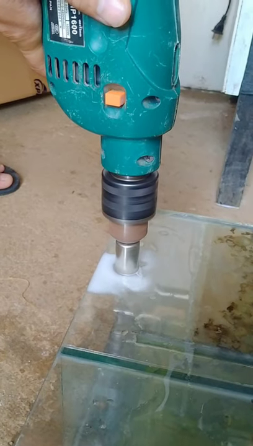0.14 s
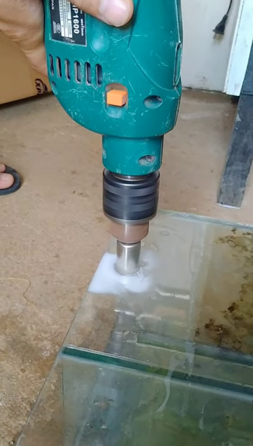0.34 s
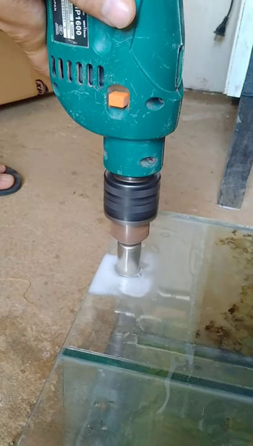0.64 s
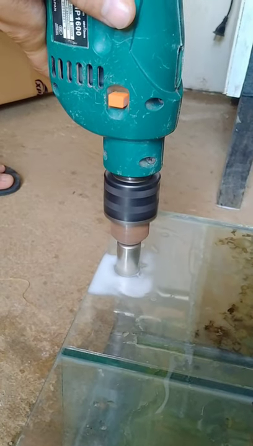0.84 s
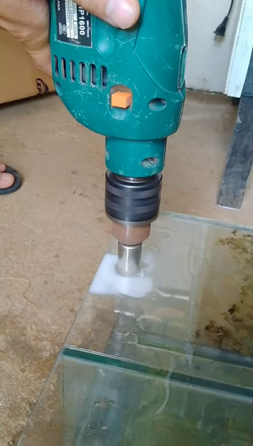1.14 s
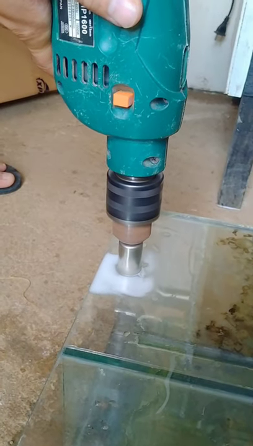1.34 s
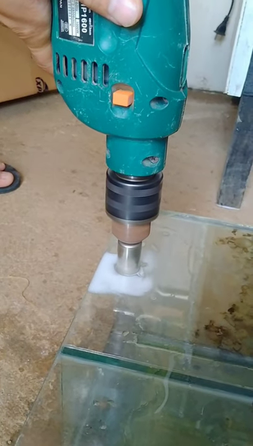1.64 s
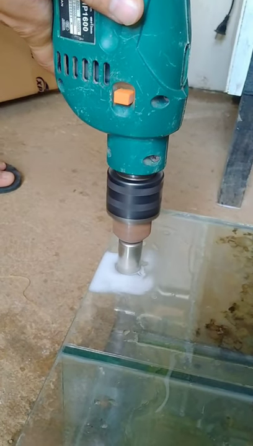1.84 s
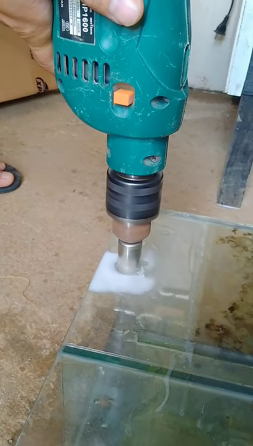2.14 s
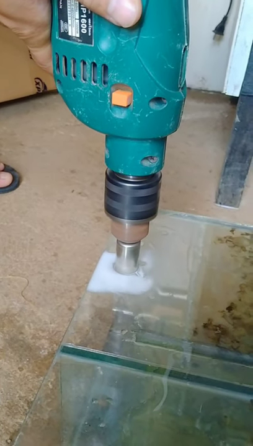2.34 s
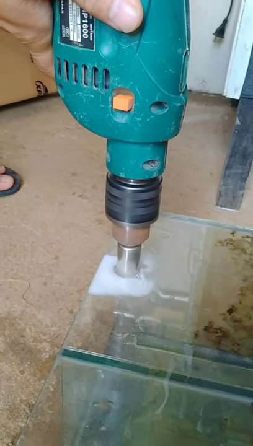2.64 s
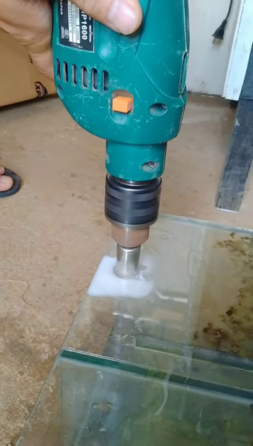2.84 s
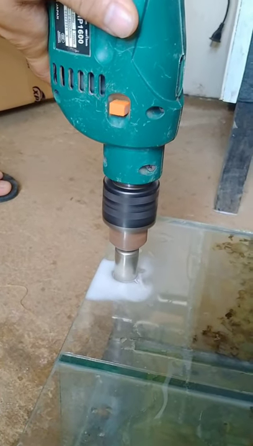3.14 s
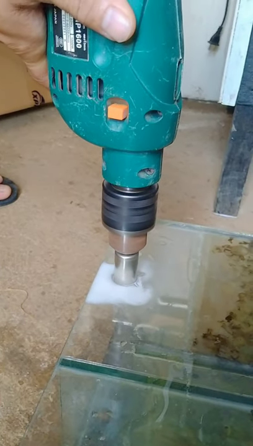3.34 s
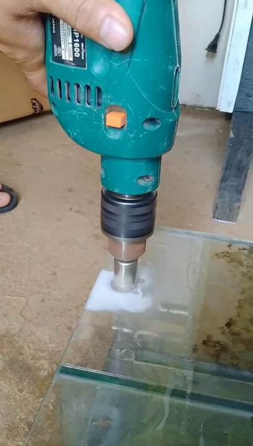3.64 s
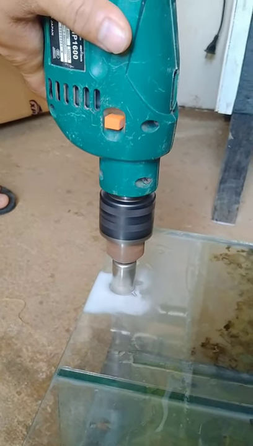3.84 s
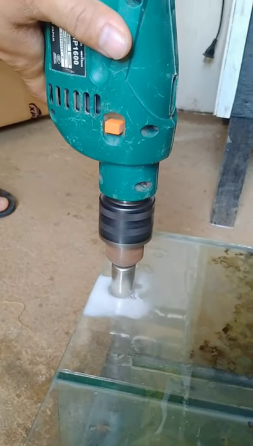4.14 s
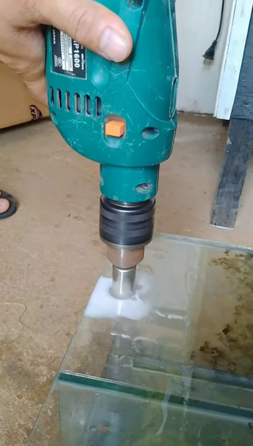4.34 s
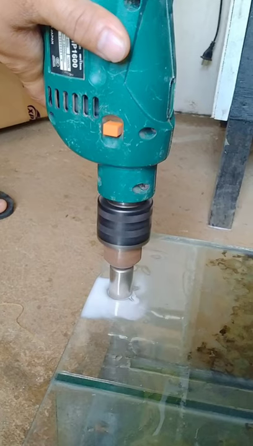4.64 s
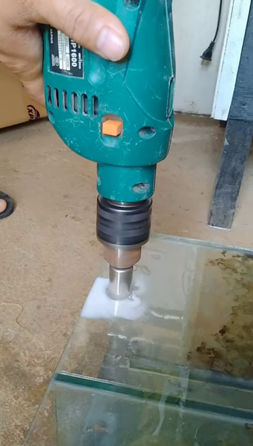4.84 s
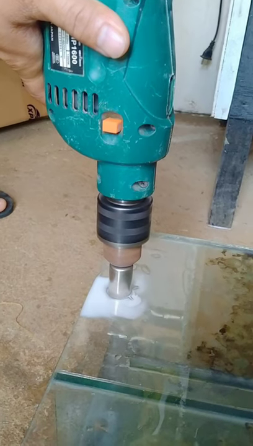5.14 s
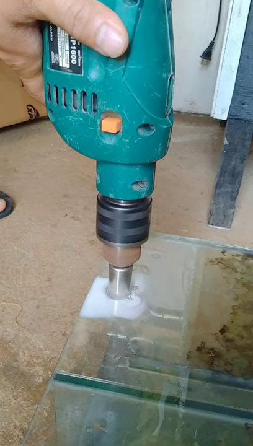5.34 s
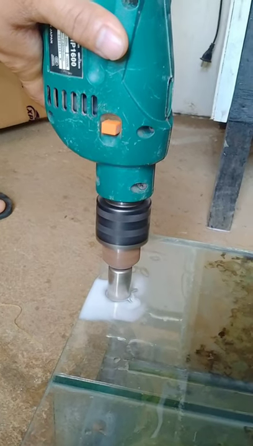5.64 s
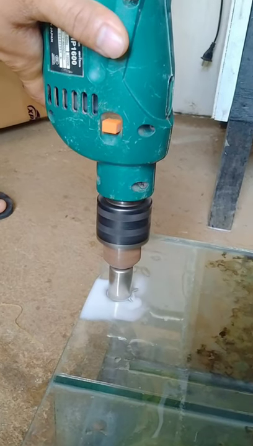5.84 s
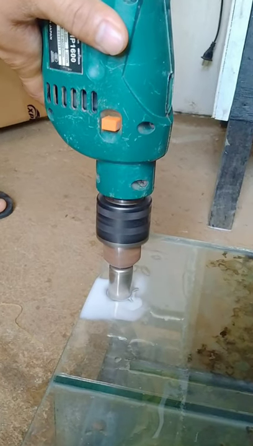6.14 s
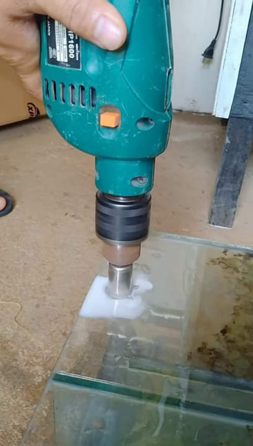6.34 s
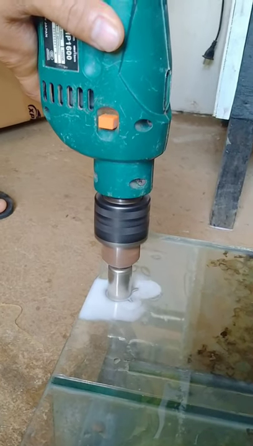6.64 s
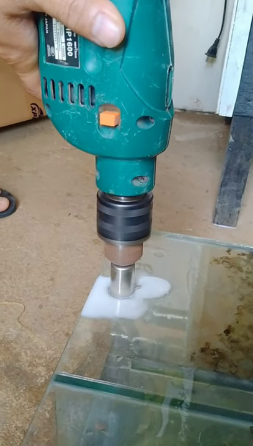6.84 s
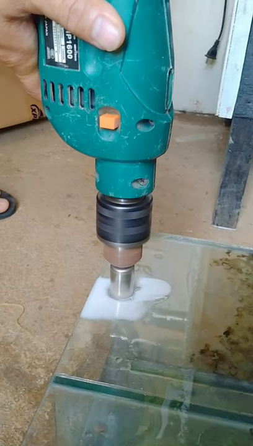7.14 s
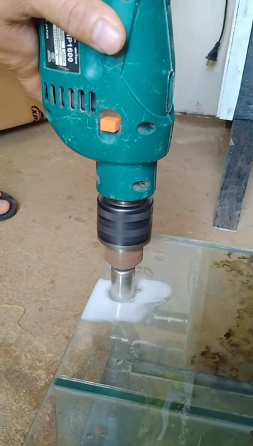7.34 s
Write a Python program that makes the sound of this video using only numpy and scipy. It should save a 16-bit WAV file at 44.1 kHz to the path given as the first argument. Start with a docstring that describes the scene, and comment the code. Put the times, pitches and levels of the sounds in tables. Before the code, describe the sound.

A corded drill is already running, its hollow bit squealing and chattering in wet glass. The speed sags briefly, then recovers and holds. A harsh mid-high squeal leads first, with short purer singing moments and shrill flares; later a lower squeal takes over as the bit binds. Gritty hiss, motor whine and fan rush continue throughout. Close microphone, dry sound, no echo.

```python
"""Core drill in wet glass

A corded drill turns a diamond core bit in wet glass, close by, without a pause.
The bit chatters at three resonances and re-cuts its own wavy groove, so the squeal splits into
multiples of the spindle speed. It mostly rocks in the cut; when it seats flush the leading resonance
sings louder and purer, and while it binds the low one takes over.
Grit grinds underneath, the motor whines through its gear and the cooling fan blows."""
import sys
import numpy as np
from scipy import signal
from scipy.fft import rfft, irfft, next_fast_len
from scipy.io import wavfile
from scipy.ndimage import uniform_filter1d, minimum_filter1d, map_coordinates

SR = 44100
rng = np.random.default_rng(int(sys.argv[2]) if len(sys.argv) > 2 else 0)


def generate_wav(signal):
    """Clip the signal to [-1, 1] and save it as 16-bit WAV at the path in sys.argv[1]."""
    frames = np.transpose(np.atleast_2d(signal))
    scaled = np.clip(frames, -1, 1) * 32767
    pcm = np.round(scaled).astype(np.int16)
    wavfile.write(sys.argv[1], SR, pcm)


N = 330309  # length in samples

# The low resonance while the bit rocks; it takes over as the cut deepens.
# Each row: time in seconds, level in dB and centre in Hz, both before the bit seats.
LOW_CHATTER = [(0, -11.5, 1094), (.42, -10, 1082), (.52, -17, 1035), (.75, -14.5, 1065), (1.1, -16, 1045),
               (2.6, -19.5, 1020), (3.9, -16.5, 1013), (4.45, -14, 1087), (5.15, -11.5, 1107),
               (5.7, -14, 1109), (6.35, -15, 1127), (6.62, -15.5, 1125), (6.82, -19.5, 1073),
               (7.49, -18.5, 1047)]
# The middle resonance, which leads from about half a second until the bit binds.
# Each row: time in seconds, level in dB before the bit seats, centre in Hz.
MIDDLE_CHATTER = [(0, -13.5, 2063), (.35, -14, 1997), (.68, -11.5, 2052), (1.2, -13.5, 1996),
                  (3.3, -14.5, 1990), (4.22, -16, 2011), (4.33, -22, 2084), (4.55, -21, 2064),
                  (4.75, -30.5, 2105), (6.62, -34.5, 2210), (6.8, -22, 2040), (7.49, -24.5, 2030)]


def amp(db):
    """Decibels turned into a plain multiplier."""
    return 10 ** (np.asarray(db) / 20)


def unit(x):
    """x scaled to an rms (average strength) of 1."""
    return x / np.sqrt(np.mean(np.abs(x) ** 2) + 1e-20)


def curves(rows):
    """One value per sample for each column after the time, joined by straight lines."""
    times, *columns = np.transpose(rows)
    return [np.interp(np.arange(N) / SR, times, column) for column in columns]


def wobble(rate):
    """A smooth random curve with rate random points a second."""
    points = rng.standard_normal(int(N * rate / SR) + 4)
    fine = signal.resample_poly(points, 10, 1)
    return np.interp(np.arange(N) * rate * 10 / SR, np.arange(len(fine)), fine)


def spell(middle_s, length_s):
    """A rounded swell from 0 to 1 and back."""
    return np.exp(-np.abs(2 * (np.arange(N) / SR - middle_s) / length_s) ** 3)


def filtered(x, response):
    """x with each frequency multiplied by response(Hz)."""
    size = next_fast_len(N + SR // 4)
    return irfft(rfft(x, size) * response(np.fft.rfftfreq(size, 1 / SR)), size)[:N]


def coloured(x, spectrum):
    """x shaped by (Hz, dB) points, at rms 1."""
    f, db = np.transpose(spectrum)
    return unit(filtered(x, lambda hz: amp(np.interp(np.log(hz + 1), np.log(f + 1), db))))


def ringing(x, modes):
    """x through resonances (Hz, half-width in Hz, dB): each is strongest at its centre."""
    def response(hz):
        power = sum(amp(db) ** 2 / (1 + ((hz - centre) / width) ** 2) ** 2 for centre, width, db in modes)
        return np.sqrt(power)
    return filtered(x, response)


def low_margin():
    """By how many dB the low resonance leads the middle one."""
    return curves(LOW_CHATTER)[0] - curves(MIDDLE_CHATTER)[0]


def binding():
    """0 while the bit runs free, 1 when it binds deep in the cut."""
    full_margin_db = 13.5
    return np.clip(low_margin() / full_margin_db, 0, 1)


def chatter(level_db, centre_hz, spread_hz, speed, turns, orders, skew, sweep, wear):
    """Self-excited ringing: the multiples of the spindle speed that lie near a resonance grow."""
    wave, power = 0, 0
    for k in orders:
        off = (k * speed - centre_hz) / spread_hz
        # a skew above 1 lets the ringing reach further above the centre than below it
        weight = np.exp(-np.maximum(off / skew, -off * skew))
        # higher multiples come later: each turn is a small upward chirp
        lag = sweep * (k - orders.mean()) ** 2 / 2
        drift = wear * wobble(2.036)  # the waves in the groove creep as it wears
        wave = wave + weight * np.exp(2j * np.pi * (k * turns - lag + drift))
        power = power + weight ** 2
    wave /= np.sqrt(power + 1e-20)
    # the bit lifts off at large swings, which evens them out
    wave /= (np.abs(wave) ** 2 + 2.4) ** 0.26
    return amp(level_db) * unit(wave.real)


def chirp_sweep(bedded):
    """Each turn's chirp is drawn out as the bit beds in (turns of lag per multiple)."""
    first, bed_in_s = .055, 2.4
    progress = np.minimum(np.arange(N) / SR / bed_in_s, 1)
    return first + (bedded - first) * progress ** 2


def shrill(speed, turns, sweep):
    """The top resonance idles faintly and flares up in spells."""
    # Each row: middle in seconds, length in seconds, level in dB added to the idling, centre in Hz.
    flares = [(.52, 0.49, -23.5, 2980), (2.38, 0.27, -21, 2936), (2.878, 0.36, -22, 2930),
              (3.33, 0.7, -25.5, 2975)]
    rest_db, rest_hz = -45.5, 2886  # between the spells
    size, centre_hz = amp(rest_db), rest_hz
    for middle_s, length_s, db, hz in flares:
        swell = spell(middle_s, length_s)
        size = size + amp(db) * swell
        centre_hz = centre_hz + (hz - rest_hz) * swell
    return size * chatter(0, centre_hz, 45, speed, turns, np.arange(76, 104),
                          skew=1.3, sweep=sweep, wear=0.2)


def squeal(speed, turns):
    """Three resonances chatter at one contact, adding octave and sum tones; the lower two alternate."""
    # The bit seats flush in its groove, or tips out of it.
    # Each row: middle in seconds, length in seconds, firmness (1 is flush, below 0 is tipped).
    seatings = [(0.022, 0.095, .5), (1.03, .18, 0.48), (1.28, 0.16, -0.2), (1.524, 0.25, 0.6),
                (1.74, 0.1, -.5), (1.87, 0.13, .3), (2.12, 0.28, 1), (2.38, 0.22, -0.36),
                (2.73, 0.14, 0.82), (2.88, 0.094, -0.65), (3.66, 0.38, 0.67), (4.795, 0.23, 0.21),
                (5.68, 0.13, -.5), (5.893, 0.21, 0.26), (6.56, 0.27, 0.66)]
    gain_db, loss_db = 5, 4.5  # when seated the leading resonance gains, the other loses
    sag_hz = 42.5  # the low resonance drops as the bit seats, by half of this when bound
    low_rocking_hz, low_bound_hz, middle_rocking_hz, seated_hz = 71, 57, 70, 16.7  # chatter spread
    lead_db = 1  # margin by which one resonance takes the lead

    seat = sum(firm * spell(middle_s, length_s) for middle_s, length_s, firm in seatings)
    lead = (1 + np.tanh(low_margin() / lead_db)) / 2  # 1 when the low resonance leads
    bind = binding()

    def favour_db(share):
        seated_db = seat * (gain_db * share - loss_db * (1 - share))
        return seated_db + 1.1 * wobble(25) + 0.52 * wobble(9)

    def spread(rocking_hz):
        return rocking_hz * (seated_hz / rocking_hz) ** np.clip(seat, -.2, 1)

    low_db, low_hz = curves(LOW_CHATTER)
    middle_db, middle_hz = curves(MIDDLE_CHATTER)
    low_spread = spread(low_rocking_hz + bind * (low_bound_hz - low_rocking_hz))
    middle_sweep = chirp_sweep(.11)
    low = chatter(low_db + favour_db(lead), low_hz - sag_hz * seat * (1 - bind / 2), low_spread,
                  speed, turns, np.arange(26, 42), skew=1.26, sweep=chirp_sweep(.21), wear=0.13)
    # half a turn later, so the two take turns within each revolution
    middle = chatter(middle_db + favour_db(1 - lead), middle_hz, spread(middle_rocking_hz),
                     speed, turns + .5, np.arange(52, 73), skew=1.13, sweep=middle_sweep, wear=0.13)
    overtones = amp(-11.0) * low * low + amp(-11.0) * low * middle + amp(-34.5) * middle * middle
    bright_overtones = filtered(overtones, lambda hz: hz > 1500)
    return low + middle + shrill(speed, turns, middle_sweep) + bright_overtones


def groove(turns, memory_turns, size):
    """Roughness round the cut, size points a turn: met again each turn, slowly worn into a new shape."""
    keep = np.exp(-1 / memory_turns)
    fresh = rng.standard_normal((int(turns[-1]) + 2, size))
    fresh[0] /= np.sqrt(1 - keep ** 2)  # the first turn is as rough as the later ones
    track = signal.lfilter([1], [1, -keep], fresh, axis=0).ravel()
    return unit(map_coordinates(track, [turns * size]))


def grinding(turns):
    """Diamond grit scrapes round the groove, biting unevenly, and rings pane, bit and rim."""
    # Resonances of the glass pane, of the middle chatter (damped by a binding bit), of the hollow
    # bit and of its bright rim. Each row: centre in Hz, half-width in Hz, relative level in dB.
    pane_modes = [(425, 193, -9), (699, 77, -2), (1050, 145, 1), (1210, 147, 0.5), (1688, 190, -4),
                  (2274, 63, 0.5), (2650, 129, 1.5), (2790, 65, 4.5), (2990, 96, -6.5), (3054, 69, 0.5),
                  (3316, 89, 0.5)]
    middle_modes = [(2040, 92, 4.5)]
    bit_modes = [(3488, 21, 2.5), (3626, 64, 1), (3843, 157, -10)]
    rim_modes = [(5565, 65, 0)]
    # Tone colour of the grit's hiss. Each row: frequency in Hz, relative level in dB per Hz.
    hiss_colour = [(2290, -39), (3900, -1.5), (4060, 0.5), (4610, -5.5), (5210, -6), (5680, -10.5),
                   (5940, -10), (7800, -18.5), (8500, -35), (9540, -43), (11600, -36), (15500, -27.5)]
    # Loudness of the hiss. Each row: time in seconds, level in dB before its gain.
    hiss_course = [(0.0, -38), (2.8, -39), (4.04, -34.5), (4.63, -34.5), (4.65, -36), (5.55, -35.5),
                   (5.97, -38), (6.74, -34.5), (7.49, -33.5)]
    # Grit on the pane. Each row: time in seconds, level in dB.
    rasp_course = [(0, -14), (2.3, -14), (4.5, -15), (7.49, -16.5)]
    hiss_gain_db = 2.5
    bit_db = -2.5  # ring of the free bit beside the pane
    bind_middle_db, bind_bit_db = -6.5, 4  # change in ringing when the bit binds
    rim_db, rim_growth = -47.5, 2.2  # the rim swells faster than the hiss

    rasp_db, = curves(rasp_course)
    hiss_db, = curves(hiss_course)
    bind = binding()

    def scrape(repeat):
        return repeat * groove(turns, memory_turns=6.7, size=1280) + rng.standard_normal(N)

    bite = amp(1.5 * groove(turns, memory_turns=14, size=6))
    force = bite * scrape(repeat=1.1)
    rings = ringing(force, pane_modes)
    rings = rings + amp(bind_middle_db * bind) * ringing(force, middle_modes)
    rings = rings + amp(bit_db + bind_bit_db * bind) * ringing(force, bit_modes)
    hiss = amp(hiss_db + hiss_gain_db) * coloured(scrape(repeat=0.6), hiss_colour)
    rim_level = amp(rim_db + rim_growth * (hiss_db - hiss_db.mean()))
    rim = rim_level * unit(ringing(force, rim_modes))
    return amp(rasp_db) * unit(rings) + hiss + rim


def motor(turns):
    """Armature tones with sidebands from the gear wheel, the ringing casing and the brushes' fizz."""
    # Each row: time in seconds, gain in dB of the higher tones and the casing.
    whine_course = [(0, -14.5), (2.4, -4.5), (3.4, -8.5), (5.6, -10), (6.9, -1.5), (7.49, -1.5)]
    # Each row: time in seconds, gain in dB of the two lowest multiples of the motor speed.
    hum_course = [(0, -15), (2.4, -7.5), (3.6, -12.5), (5.8, -7.5), (6.5, -5), (7.15, -1), (7.49, -4)]
    # Armature tones. Each row: multiple of the motor speed, sideband in spindle turns.
    tones = [(1, 0), (1, 1), (2, 0), (2, 1), (4, -3), (5, 0), (8, 0), (8, 1), (16, 1), (16, 2), (34, 0)]
    # One level in dB for each tone, before the gains above.
    tone_levels = [-32, -37.5, -34.5, -30, -29, -34, -31, -25.5, -50.5, -51.5, -63]
    # Casing rung by the armature. Each row: centre in Hz, half-width in Hz, relative level in dB.
    casing_modes = [(2785, 97, 6), (5610, 67, -14.5)]
    # Fizz of the brushes. Each row: frequency in Hz, relative level in dB per Hz.
    brush_colour = [(4000, -13), (8000, -2.5), (9500, -6), (10500, -2), (11800, -1), (12600, -3.5),
                    (15500, -7.5)]
    gear = 29 / 3  # motor turns per spindle turn

    whine_db, = curves(whine_course)
    hum_db, = curves(hum_course)
    motor_turns = gear * turns + 0.0021 * wobble(38)  # play in the gear
    sound = amp(whine_db - 24) * unit(ringing(rng.standard_normal(N), casing_modes))
    for (k, side), db in zip(tones, tone_levels):
        gain_db = hum_db if k <= 2 else whine_db
        level_db = db + gain_db + 2.5 * wobble(7)
        cycles = k * motor_turns + side * turns + rng.random()
        sound += np.sqrt(2) * amp(level_db) * np.sin(2 * np.pi * cycles)
    fizz = amp(-50.5) * coloured(rng.standard_normal(N), brush_colour)
    return sound + fizz


def fan():
    """Cooling air leaves the vents in a low, uneven rush, made of shaped noise."""
    # Loudness of the draught. Each row: time in seconds, level in dB before its gain.
    draught_course = [(0.0, -29), (0.1, -27.5), (1.48, -34), (2.33, -29), (2.86, -39), (3.0, -31.5),
                      (4.07, -27.5), (6.4, -38), (6.51, -32.5), (7.49, -38.5)]
    # Tone colour of the draught. Each row: frequency in Hz, relative level in dB per Hz.
    air_colour = [(13, -72), (22, -38), (43, -40.5), (93, -5.5), (129, 0), (312, -0.5), (341, -4),
                  (450, -11), (580, -35), (990, -120)]
    gain_db = -0.8
    air_db, = curves(draught_course)
    level = amp(air_db + gain_db + 0.55 * wobble(7.5))
    return level * coloured(rng.standard_normal(N), air_colour)


def scene():
    """One spindle, sagging under load and recovering, drives the squeal, the grit and the motor."""
    # Each row: time in seconds, spindle speed in turns per second.
    spindle = [(0, 30.9), (.15, 29.66), (.38, 28.8), (.5, 29.26), (.7, 32.05), (.88, 33.65), (1.1, 34.52),
               (1.5, 35.28), (2.2, 35.68), (3.7, 35.82), (5.35, 35.38), (6, 35.73), (7.49, 35.78)]
    speed, = curves(spindle)
    turns = np.cumsum(speed) / SR
    return (squeal(speed, turns) + grinding(turns) + motor(turns) + fan())[None]


def limited(x, ceiling, hold_s):
    """A fast limiter: the gain ducks smoothly just ahead of each peak and comes back."""
    size = int(hold_s * SR) + 1
    needed = minimum_filter1d(ceiling / np.maximum(np.abs(x), ceiling), size)
    gain = uniform_filter1d(uniform_filter1d(needed, size), size // 2)
    return x * gain


def record(dry):
    """The recorder holds the peaks down, cuts the deep bass and keeps nothing above its band limit."""
    bass_hz, top_hz = 64, 15750
    held = limited(dry[0], ceiling=.77, hold_s=.002)
    return filtered(held, lambda hz: hz ** 4 / (hz ** 4 + bass_hz ** 4) * (hz < top_hz))[None]


dry = scene()
out = record(dry)
generate_wav(out)
```